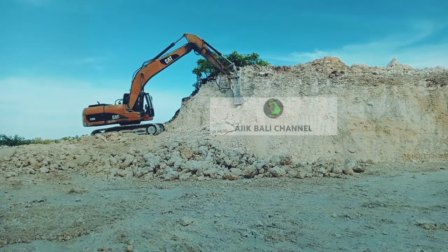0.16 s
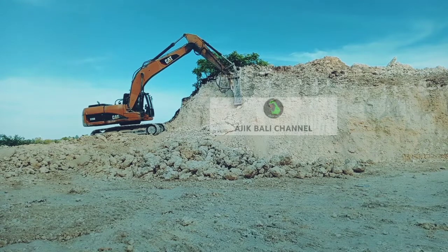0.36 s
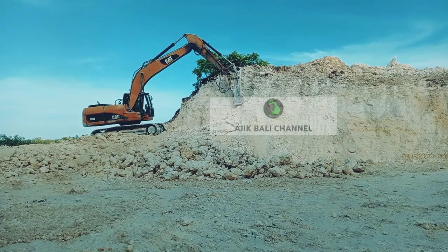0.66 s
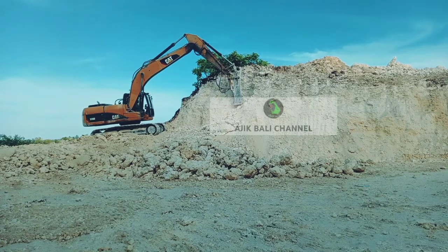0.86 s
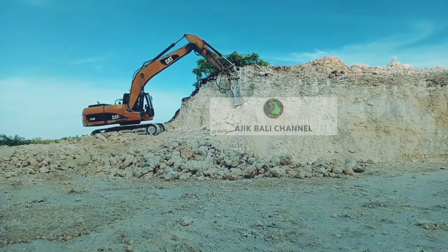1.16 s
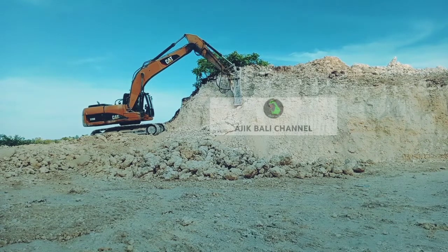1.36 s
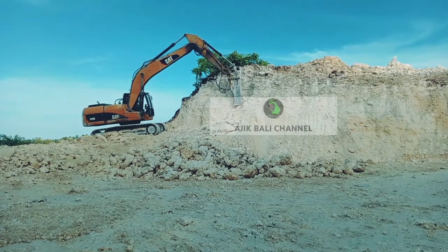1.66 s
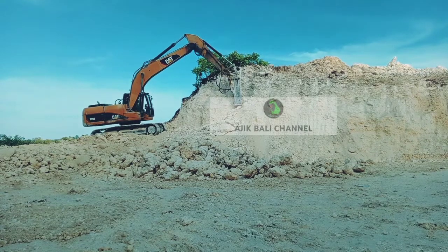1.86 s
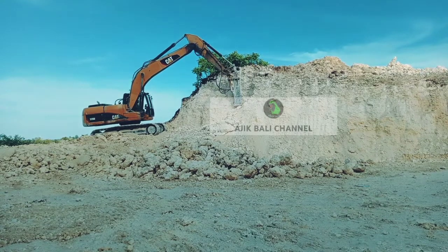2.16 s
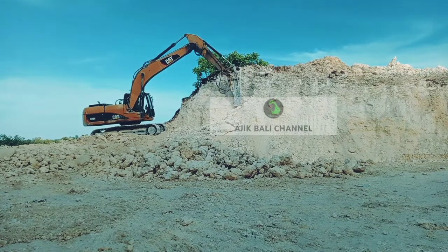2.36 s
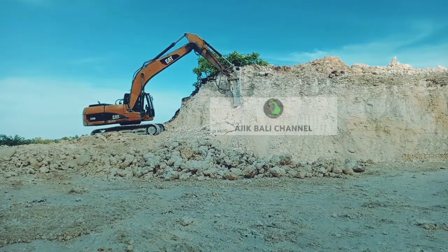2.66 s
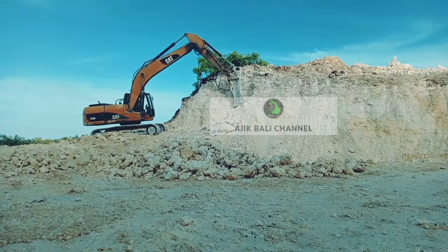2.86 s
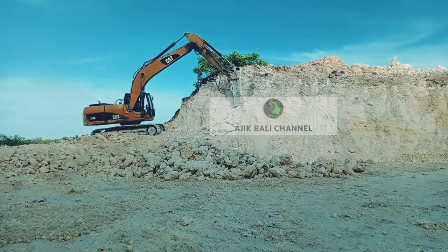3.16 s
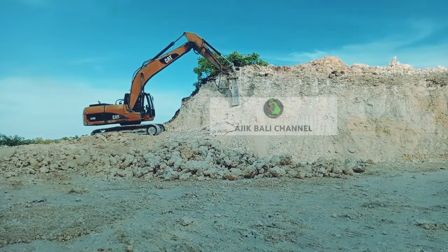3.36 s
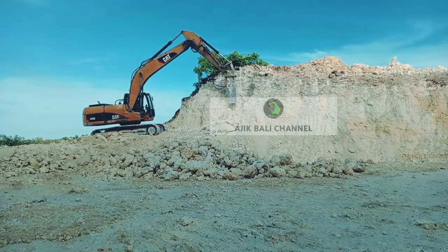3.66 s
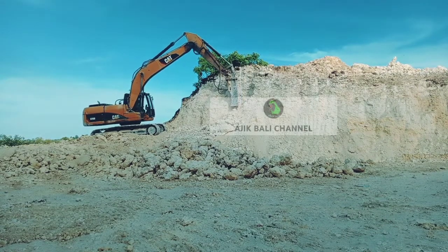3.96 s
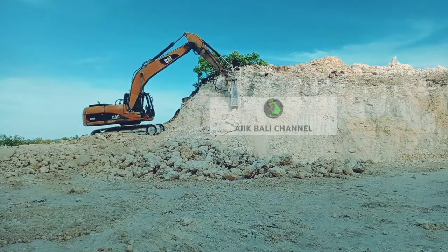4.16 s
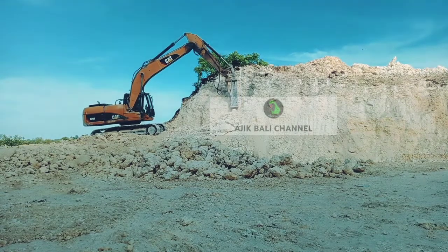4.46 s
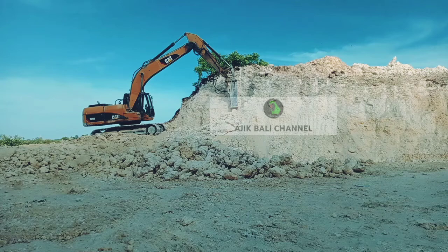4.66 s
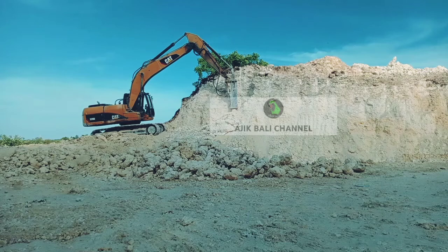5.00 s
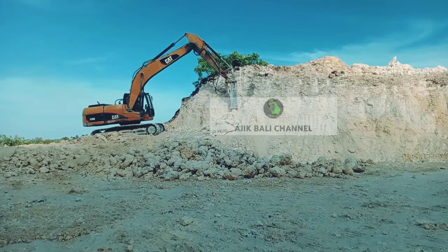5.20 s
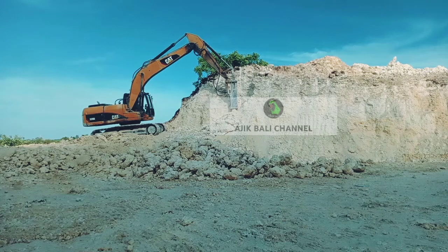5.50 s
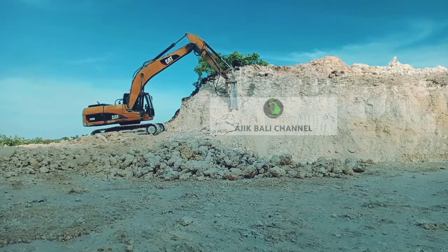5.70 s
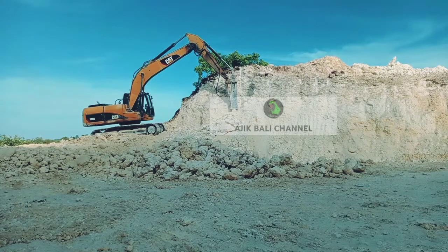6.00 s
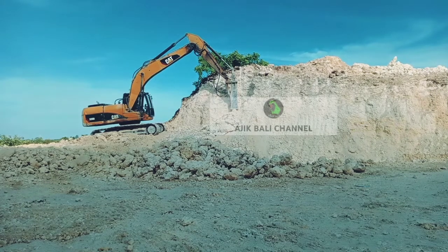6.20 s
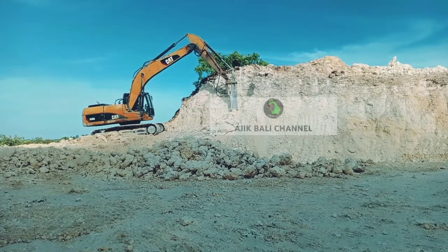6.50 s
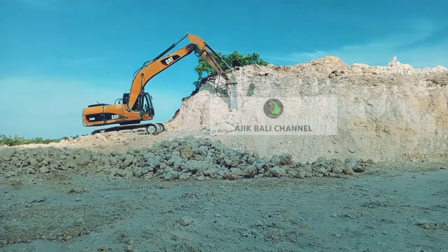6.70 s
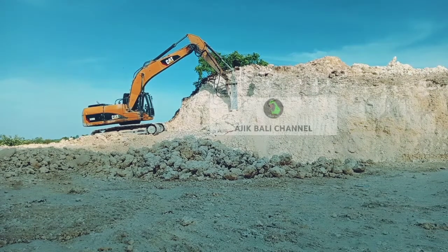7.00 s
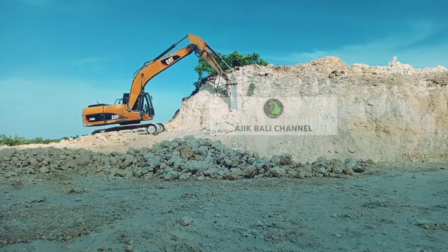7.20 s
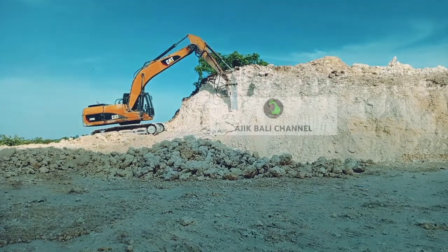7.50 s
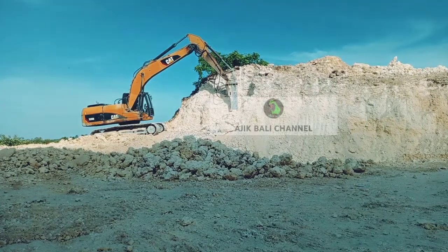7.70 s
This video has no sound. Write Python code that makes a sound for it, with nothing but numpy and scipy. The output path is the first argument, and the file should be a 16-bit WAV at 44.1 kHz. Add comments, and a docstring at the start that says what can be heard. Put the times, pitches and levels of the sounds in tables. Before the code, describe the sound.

Fast, ringing hammer blows on rock in a quarry, with a short break where stones slide and a diesel engine keeps running.

```python
"""A hydraulic breaker on an excavator hammers a rock face some way off in an open quarry.
Before each blow the control valve snaps over; the impact then thumps the ground, crushes rock and
excites the damped modes of chisel, housing and boom. In a pause the hammering stops, loose rock
knocks and slides down the face and steel squeals on stone. The diesel and its pump run throughout.
Ground and walls reflect the sounds of steel and rock, and distance dulls the treble."""
import sys
import numpy as np
from scipy import signal
from scipy.fft import rfft, irfft, next_fast_len
from scipy.io import wavfile

SR = 44100
rng = np.random.default_rng(int(sys.argv[2]) if len(sys.argv) > 2 else 0)


def dump(signal):
    """Clip the signal to [-1, 1] and save it as 16-bit WAV at the path in sys.argv[1]."""
    limited = np.clip(np.atleast_2d(signal).T, -1, 1)
    pcm = np.round(limited * 32767).astype(np.int16)
    wavfile.write(sys.argv[1], SR, pcm)


N = 346185

# Spectrum of the diesel's roar. Each row: frequency in Hz, relative level in dB.
DIESEL_SPECTRUM = [(25, -50.5), (50, -12.5), (122, -1.5), (153, -4), (180, -5.5), (261, -5), (329, -17),
                   (405, -10), (476, -13), (870, -14.5), (1070, -18), (2580, -24), (5000, -38.5),
                   (16000, -36.5)]
# Engine as heard: its level ducks after the hammering and swells back as the recorder's gain recovers.
# Each row: time in seconds, heard diesel level in dB, pump pitch in Hz, pump and whine levels in dB.
ENGINE_AS_HEARD = [(0, -20, 308, -35, -40), (1, -22.5, 309, -30.5, -47), (1.9, -23.5, 303.4, -39, -43),
                   (2.4, -26, 305.3, -38.5, -43), (2.75, -28.5, 289.8, -39, -48),
                   (3.2, -22.5, 300, -33, -47), (3.5, -23, 290.8, -29, -46), (3.85, -22.5, 306.2, -30, -47),
                   (4.3, -24.5, 308.5, -48, -50), (6, -21.5, 306.2, -35, -48), (7.85, -21.5, 307, -47, -56)]
# Spectrum of loose stones. Each row: frequency in Hz, relative level in dB.
STONE_SPECTRUM = [(47, -49), (80, -20), (160, -0.5), (309, -1.5), (445, -4), (687, -0.5), (1100, -7.5),
                  (1550, -8.5), (2900, -15), (5000, -30), (16000, -35.5)]
# Rock slides. Each row: start in seconds, swell in ms, start of decay in ms, t60 in seconds, level in dB.
ROCK_SLIDES = [(3.23, 77, 117, 1.33, -18), (3.96, 39, 550, 0.28, -20.5)]
# Steel dragging on rock. One row: swell in ms, length in ms, pitch in Hz, rise in Hz/s, level in dB.
STEEL_DRAG = (28, 157, 1071, 480, -22.5)
# Loose parts ringing. Each row: start in seconds, frequency in Hz, level in dB, length in ms.
PART_CLINKS = [(3.334, 320, -23, 33), (3.415, 2090, -25.5, 11), (3.465, 4070, -35, 11),
               (3.465, 5370, -37, 10), (3.503, 4800, -41, 6), (3.515, 3860, -42, 21), (4.04, 214, -19, 72),
               (4.035, 758, -16, 40), (4.48, 865, -13.5, 23.4)]
# Knocks of tool and stones. Each row: start in seconds, grit in dB, thud in dB, length in ms.
LOOSE_KNOCKS = [(2.308, -19, -30, 24), (2.545, -16.5, -24, 14), (2.627, -25.5, -38, 8.2),
                (3.3, -16.5, -18, 8.2), (3.33, -14, -8.5, 17), (3.42, -25, -22, 8), (3.509, -18.5, -20, 11),
                (3.549, -22, -22, 4.6), (3.599, -32, -17, 9.9), (3.708, -16.5, -22, 9.9),
                (4.032, -15.5, -24, 20), (4.072, -19.5, -32, 9.4), (4.194, -14, -22, 32),
                (4.344, -13.5, -33, 17), (4.388, -13, -31, 15), (4.479, -13.5, -23, 11),
                (4.515, -16.5, -23, 4.2)]
# The valve's spool hits its stop and rebounds. Each row: delay in ms, relative level in dB.
SPOOL_TOUCHES = [(0, 19), (3.6, 12), (6.8, 15.5), (11, 8.5), (15, 1.5)]
# Modes of the valve. Each row: frequency in Hz, relative level in dB, t60 in seconds.
VALVE_MODES = [(696, 7.5, 0.049), (1503, 5, 0.059), (2560, 0, 0.011), (3066, -1.5, 0.018), (3460, 4, 0.01),
               (3728, 5.5, 0.011), (4050, -4.5, 0.0093), (4880, -8, 0.017), (7200, -15, 0.008)]
# The chisel's two clear rings, damped as it settles on the rock.
# Each row: frequency in Hz, free ringing in ms, t60 in seconds, lingering part in dB.
CHISEL_RINGS = [(537.6, 36.3, 0.075, -45), (2261, 21.2, 0.038, -16)]
# The chisel's seat in the rock.
# Each row: time in seconds, depth from 0 (hard seat) to 1 (sunk in), low ring in dB, high ring in dB.
CHISEL_SEAT = [(0, 0.56, -24, -28), (.45, .3, -24, -21), (.7, .1, -14.5, -28), (1.5, 0.2, -17.5, -32),
               (2.25, 0.2, -15.5, -29), (2.499, 0.55, -24, -24), (3.9, 0.64, -36, -14.5),
               (4.6, .64, -34, -23.5), (5.4, 0.66, -30, -19), (5.9, 0.94, -38, -16.5),
               (6.25, .66, -12.5, -20.5), (6.5, 0.73, -30, -17), (7, 0.59, -27, -25.5),
               (7.15, 0.84, -15, -21), (7.85, 0.55, -23, -21.5)]
# Modes of chisel, housing and boom.
# Each row: frequency in Hz, relative dB on a hard seat, relative dB sunk in, free t60 in seconds.
STEEL_MODES = [(319.6, -13, -10.5, 0.16), (447, -15, -3.5, .12), (551.7, -4.5, -3.5, 0.12),
               (589, -6.5, -4, 0.047), (715, -6.5, 3, 0.048), (735, -4, -5.5, 0.15), (817, -9, -5, .13),
               (817.6, -1.5, -7, .13), (913.5, -5, -8, 0.058), (988.3, -1.5, -12, 0.15),
               (1113, -5, -6, 0.099), (1150, -7.5, -9, 0.095), (1514, -10, -7.5, 0.061),
               (1614, -16, -19.5, 0.12), (1820, -12, -6, 0.067), (1887, -21, -25.5, 0.054),
               (2207, -7.5, -10, 0.089), (2414, -7, -25.5, 0.024), (2580, -11.5, -14, 0.072),
               (2784, -11.5, -34.5, 0.08), (3430, -11, -15.5, 0.058), (4076, -27.5, -23.5, 0.043)]
# Spectrum of rock being crushed. Each row: frequency in Hz, relative level in dB.
CRUSH_SPECTRUM = [(120, -22.5), (200, -10), (367, 2.5), (515, -21.5), (712, 10.5), (1130, 2.5), (1520, -6),
                  (2310, -8), (2680, -18), (3510, -21.5), (5000, -28.5), (16000, -34)]
# Piston blows. Each row: start in seconds, rattle and ground thump in relative dB, valve lead in ms.
PISTON_BLOWS = [(0.0, -15.5, -40, 15), (0.103, -6, -20, 19), (0.226, -4.5, -16, 12), (0.365, -6, -16, 17),
                (0.493, -6, -15.5, 24), (0.625, -6.5, -17.5, 25.5), (0.758, -6, -15.5, 19.5),
                (0.885, -4, -15.5, 20), (1.014, -5.5, -14.5, 19), (1.156, -7.5, -16.5, 23),
                (1.273, -6.5, -15.5, 11), (1.41, -8.5, -19.5, 16), (1.537, -4.5, -19, 22),
                (1.678, -9, -27.5, 21), (1.813, -4.5, -18, 19.5), (1.951, -5, -19, 20),
                (2.097, -5.5, -19.5, 8), (2.266, -5, -20.5, 28), (2.489, -3, -24.5, 28.5),
                (3.941, -5.5, -21, 1.5), (4.137, -7, -25, 21), (4.288, -5, -24, 21),
                (4.439, -6.5, -24, 25.5), (4.592, -6.5, -17.5, 23.5), (4.735, -5, -17, 21.5),
                (4.871, -4.5, -16.5, 20), (5.012, -8.5, -19, 19), (5.149, -9.5, -19.5, 25),
                (5.285, -10.5, -36, 25.5), (5.406, -4.5, -15.5, 13), (5.547, -2, -16.5, 21),
                (5.682, -6, -15, 17.5), (5.811, -6, -15, 25.5), (5.94, -5, -17, 11), (6.078, -4.5, -15, 25),
                (6.217, -7.5, -19.5, 28), (6.342, -4.5, -14.5, 25), (6.471, -4.5, -13, 16),
                (6.606, -6, -14, 26), (6.728, -5.5, -14.5, 10), (6.868, -6.5, -14, 17.5),
                (7.006, -7, -17, 23.5), (7.126, -5, -13, 13.5), (7.26, -5.5, -13.5, 23.5),
                (7.401, -6.5, -16, 26.5), (7.522, -4.5, -13, 12.5), (7.657, -7.5, -13.5, 27),
                (7.793, -8.5, -18, 27.5)]
# Reflections from ground and walls. Each row: delay in seconds, level in dB before filtering.
REFLECTIONS = [(0.016, -18.5), (0.058, -15), (.14, -23)]
# Response of the air path and microphone. Each row: frequency in Hz, gain in dB.
PATH_RESPONSE = [(30, 1.5), (70, 1.5), (4000, -1.5), (5000, -5.5), (6000, -13.5), (6600, -12),
                 (7000, -13.5), (7400, -12), (8300, -19.5), (10500, -31.5), (12500, -36.5), (15300, -28.5)]


def from_db(db):
    """Amplitude ratio of a level in dB."""
    return 10 ** (np.asarray(db) / 20)


def rms_one(x):
    """Normalisation to an rms of 1."""
    return x / np.sqrt(np.mean(x ** 2) + 1e-20)


def curves_at(rows, times):
    """Linear interpolation of a table's columns at times in seconds."""
    s, *columns = np.transpose(rows)
    return [np.interp(times, s, column) for column in columns]


def gains(spectrum, size):
    """Gain at every bin of a transform, interpolated over log frequency."""
    hz, db = np.transpose(spectrum)
    return from_db(np.interp(np.log(np.fft.rfftfreq(size, 1 / SR) + 1), np.log(hz), db))


def coloured(x, spectrum):
    """Spectral shaping that preserves the power of white noise."""
    size = next_fast_len(len(x))
    return irfft(rfft(x, size) * rms_one(gains(spectrum, size)), size)[:len(x)]


def highpass(x, hz):
    """Second-order high-pass filtering."""
    return signal.sosfilt(signal.butter(2, hz, "high", fs=SR, output="sos"), x)


def drift(hz):
    """Slow random fluctuation: low-passed noise of rms 1."""
    r = np.exp(-80 * np.pi * hz / SR)
    slow = signal.lfilter([1], [1, -2 * r, r * r], rng.standard_normal(N // 40 + 2002))[2000:]
    return np.interp(np.arange(N) / 40, np.arange(len(slow)), rms_one(slow))


def ring(drive, hz, t60):
    """Forced response of one damped mode; it preserves the power of white noise."""
    r, w = from_db(-60 / (t60 * SR)), 2 * np.pi * hz / SR
    return signal.lfilter([0, 2 * np.sin(w) * np.sqrt(1 - r)], [1, -2 * r * np.cos(w), r * r],
                          drive + 1e-18)


def add(out, s, piece):
    """Superposition of a piece at a time in seconds."""
    at = round(s * SR)
    piece = piece[max(-at, 0):N - at]
    out[max(at, 0):max(at, 0) + len(piece)] += piece


def burst(hold_ms, t60, rise_ms, size=9000):
    """Envelope with a linear rise and exponential decay from hold_ms on."""
    ms = np.arange(size) / SR * 1000
    return np.minimum(ms / rise_ms, 1) * from_db(-.06 * np.maximum(ms - hold_ms, 0) / t60)


def quarry(x, tail_t60=0.94, tail_db=-14):
    """Reverberation: rough rock faces return smeared, dull echoes and a scattered tail."""
    t = np.arange(SR // 2) / SR
    decay = rms_one(from_db(-60 * t / tail_t60))
    envelope = from_db(tail_db) * decay * np.minimum(t / 0.0053, 1) / np.sqrt(len(t))
    for s, db in REFLECTIONS:
        envelope[round(s * SR):round(s * SR) + 200] += from_db(db) / np.sqrt(200)
    scatter = envelope * rng.standard_normal(len(t))
    response = signal.lfilter(*signal.butter(1, [280, 3500], "band", fs=SR), scatter)
    return x + signal.fftconvolve(x, response)[:N]


def engine(pistons=9, firings_per_turn=3, whine_hz=2910):
    """Periodic forcing: firings modulate a roar and pump pistons give harmonics, under a thin whine."""
    heard_db, pump_hz, pump_db, whine_db = curves_at(ENGINE_AS_HEARD, np.arange(N) / SR)
    turns = np.cumsum(pump_hz * (1 + 0.0034 * drift(12.3))) / SR / pistons
    firing = 1 + 0.15 * np.cos(2 * np.pi * firings_per_turn * turns)
    firing += 0.054 * np.cos(np.pi * turns)   # cylinders differ over two turns
    flicker = from_db(.8 * drift(25))
    roar = coloured(rms_one(firing * flicker * rng.standard_normal(N)), DIESEL_SPECTRUM)
    pump = sum(from_db(db + 1.2 * drift(8.9)) * np.sin(2 * np.pi * k * pistons * turns)
               for k, db in enumerate([2, -5.5, -1.5, -14], start=1))
    whine_gain = from_db(whine_db + 4.6 * drift(30))
    whine_pitch = whine_hz * (1 + 0.0022 * drift(26) + .008 * drift(1.3))
    whine = whine_gain * np.sin(2 * np.pi * np.cumsum(whine_pitch) / SR)
    return from_db(heard_db) * roar + from_db(pump_db) * pump + whine


def slide(clicks_per_s=2500):
    """Shot noise: dense, uneven collisions of stones merge into a rush that swells and dies away."""
    sizes = from_db(3.1 * np.minimum(rng.exponential(1, N), 4)) * rng.choice([-1, 1], N)
    clicks = sizes * (rng.random(N) < clicks_per_s / SR)
    grains = rms_one(clicks + 0.25 * rng.standard_normal(N))
    stones = coloured(grains, STONE_SPECTRUM) + from_db(-22) * highpass(grains, 3500)
    flow = np.zeros(N)
    for s, swell_ms, hold_ms, t60, db in ROCK_SLIDES:
        add(flow, s, from_db(db) * burst(hold_ms, t60, swell_ms, size=2 * SR))
    return flow * from_db(1.5 * drift(25)) * stones


def squeal(start_s=3.39):
    """Friction: steel dragging on rock gives a rough, rising tone."""
    swell_ms, ms, hz, rise_hz_per_s, db = STEEL_DRAG
    drag = np.zeros(N)
    add(drag, start_s, from_db(db) * burst(ms, 0.037, swell_ms, size=SR))
    pitch = hz + rise_hz_per_s * np.clip(np.arange(N) / SR - start_s, 0, ms / 1000)
    pitch *= 1 + 0.052 * drift(46)
    return drag * from_db(4.1 * drift(30)) * np.sin(2 * np.pi * np.cumsum(pitch) / SR)


def clinks():
    """Resonance: a short noise burst excites one mode of each loose part."""
    out = np.zeros(N)
    for s, hz, db, ms in PART_CLINKS:
        drive = rng.standard_normal(9000) * burst(ms, 0.047, 3.6)
        add(out, s, from_db(db) * ring(drive, hz, t60=.025))
    return out


def thump(hz=152, length_s=0.0174, rebound_db=-11.5):
    """Transient vibration of the ground: a few swings, then a weaker, slower rebound."""
    t = np.arange(round(length_s * SR)) / SR
    hump = np.sin(np.pi * t / t[-1]) ** 1.34
    push = -np.sin(2 * np.pi * hz * t) * hump
    rebound = from_db(rebound_db) * np.sin(2 * np.pi * 0.854 * hz * t) * hump
    return np.concatenate([push, rebound])


def knocks():
    """Inelastic impacts: bursts of grit over a thud, brightened by fresh chips."""
    grit, thud = np.zeros((2, N))
    for s, grit_db, thud_db, ms in LOOSE_KNOCKS:
        add(grit, s, from_db(grit_db) * rng.standard_normal(9000) * burst(ms, 0.079, 1.5))
        add(thud, s, from_db(thud_db) * thump())
    chips = from_db(-22) * highpass(grit, 4000)
    return coloured(grit, STONE_SPECTRUM) + chips + thud


def valve(rise_db_per_s=0.18, spread_db=0.9):
    """Impulse excitation: the rebounding spool rings the valve before each blow, and oil hisses."""
    snap, oil = np.zeros((2, N))
    touch_ms, touch_db = np.transpose(SPOOL_TOUCHES)
    touches = np.bincount((touch_ms * SR / 1000).astype(int), from_db(touch_db), 9000)
    for s, *_, lead_ms in PISTON_BLOWS:
        noise = rng.standard_normal(9000)
        gain = from_db(-21.5 + rise_db_per_s * s + spread_db * noise[0])
        rattle = noise * burst(3.9, 0.073, 0.94)
        add(snap, s - lead_ms / 1000, gain * (from_db(-2.5) * rattle + touches))
        add(oil, s - lead_ms / 1000, gain * rattle)
    modes = sum((-1) ** k * from_db(db) * ring(snap, hz, t60)
                for k, (hz, db, t60) in enumerate(VALVE_MODES))
    return from_db(-9.5) * modes + from_db(1) * highpass(oil, 4500)


def chisel(spread_db=1.8, flutter_db=3):
    """Free vibration: each blow starts two clear rings, whose levels depend on the seat."""
    out, t = np.zeros(N), np.arange(9000) / SR
    linger = burst(hold_ms=30, t60=0.39, rise_ms=25)
    for s, *_ in PISTON_BLOWS:
        levels_db = curves_at(CHISEL_SEAT, s)[1:] + spread_db * rng.standard_normal(2)
        for (hz, free_ms, t60, linger_db), db in zip(CHISEL_RINGS, levels_db):
            envelope = burst(free_ms, t60, 0.85) + from_db(linger_db) * linger
            add(out, s, from_db(db) * np.sin(2 * np.pi * hz * t) * envelope)
    return out * from_db(flutter_db * drift(40))


def breaker(repeated=.35, spread_db=1.5, held_t60=.09, bounce_s=.021):
    """Modal response to impact: blows crush rock and shake the steel, whose modes the seat weights."""
    shake, crack, ground = np.zeros((3, N))
    starts = np.array(PISTON_BLOWS)[:, 0]
    depths = curves_at(CHISEL_SEAT, starts)[0]
    common = rng.standard_normal((2, 9000))   # the part of rattle and bounce that every blow repeats
    crumble = from_db(-21) * burst(33, 0.4, 22)   # grit keeps falling
    for (s, db, thump_db, _), sunk in zip(PISTON_BLOWS, depths):
        fresh = rng.standard_normal((2, 9000))
        rattle, bounce = repeated * common + np.sqrt(1 - repeated ** 2) * fresh
        strike = from_db(3 - 5 * sunk) * burst(1.57, 0.017, 0.27)   # hardest on bare rock
        hold = burst(8.6 + 14 * sunk, 0.11, 0.75)
        add(shake, s, from_db(db) * rattle * (strike + hold + crumble))
        bounce_db = db - 15 + 14.5 * sunk   # one bounce, stronger when sunk in
        add(shake, s + bounce_s, from_db(bounce_db) * bounce * burst(3.7, 0.056, 0.97))
        add(crack, s, from_db(-17.5 + 0.85 * db) * rattle * burst(6.7, 0.15, 0.26))
        add(ground, s, from_db(thump_db + 9.5) * thump())
    latest_blow = np.maximum(np.searchsorted(starts, np.arange(N) / SR) - 1, 0)
    uneven_db = spread_db * rng.standard_normal((len(starts), len(STEEL_MODES)))
    steel = np.zeros(N)
    for k, (hz, hard_db, sunk_db, t60) in enumerate(STEEL_MODES):
        mode_db = hard_db + depths * (sunk_db - hard_db) + uneven_db[:, k]
        drive = from_db(mode_db)[latest_blow] * shake
        steel += (-1) ** k * ring(drive, hz, min(t60, held_t60))   # pressed on rock, no mode rings long
    crush = coloured(shake, CRUSH_SPECTRUM)
    bright_crack = highpass(coloured(crack, CRUSH_SPECTRUM), 2600)
    return from_db(-13) * steel + from_db(-8.5) * crush + from_db(22.5) * bright_crack + ground


def scene():
    """Superposition in one channel: the reverberant work at the rock face and the direct engine."""
    work = breaker() + valve() + chisel() + knocks() + clinks() + slide() + squeal()
    return (quarry(work) + engine())[None]


def record(dry, cutoff_hz=15450):
    """Air absorption and the microphone dull the treble; saturation rounds peaks; the top is cut."""
    size = next_fast_len(N)
    heard = irfft(rfft(dry, size) * gains(PATH_RESPONSE, size), size)[:, :N]
    lowpass = signal.ellip(10, .5, 70, cutoff_hz, fs=SR, output="sos")
    return signal.sosfilt(lowpass, 1.196 * np.tanh(heard / 1.38))


dry = scene()
out = record(dry)
dump(out)
```